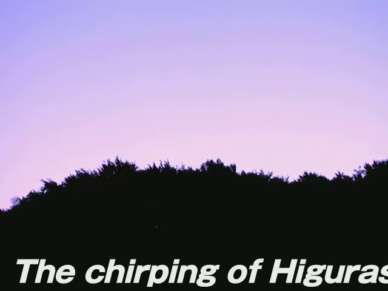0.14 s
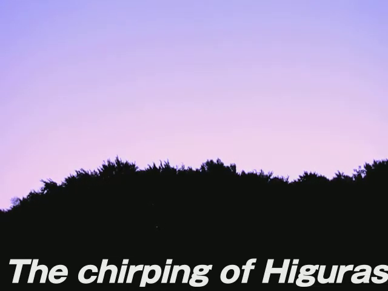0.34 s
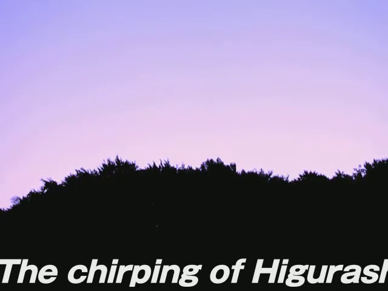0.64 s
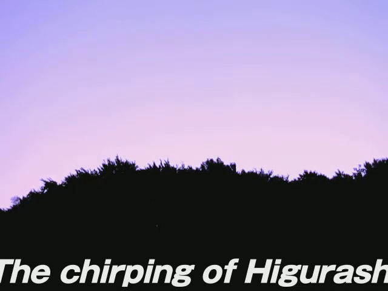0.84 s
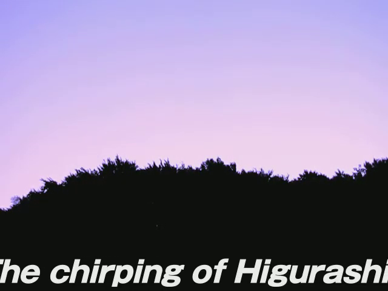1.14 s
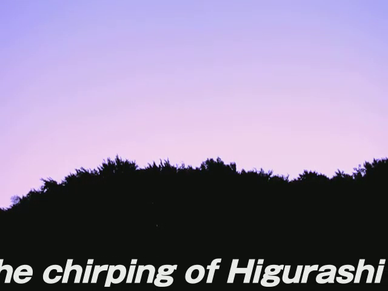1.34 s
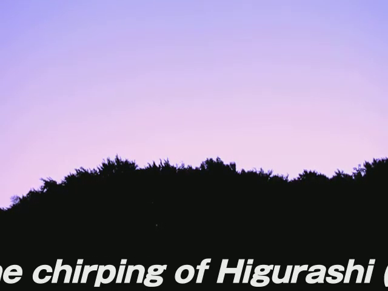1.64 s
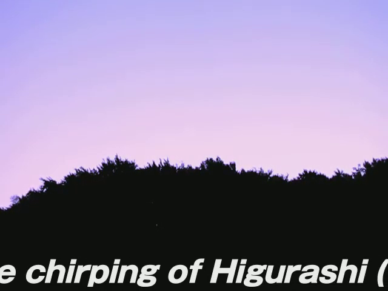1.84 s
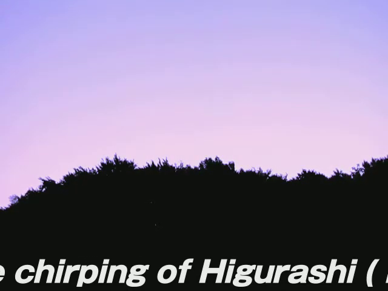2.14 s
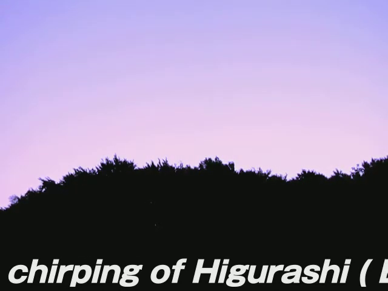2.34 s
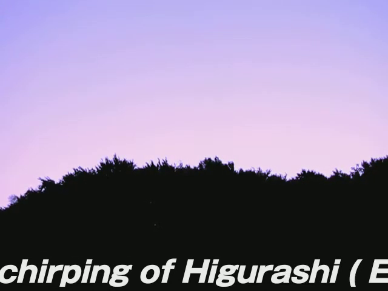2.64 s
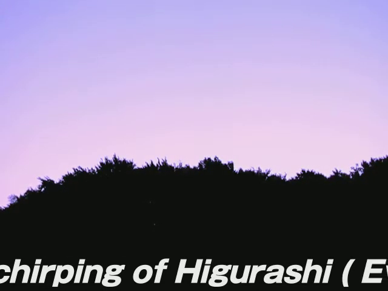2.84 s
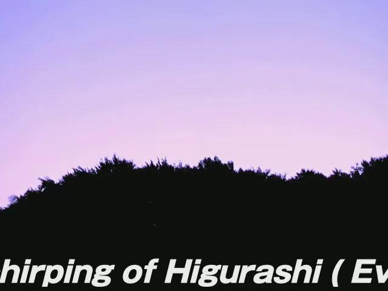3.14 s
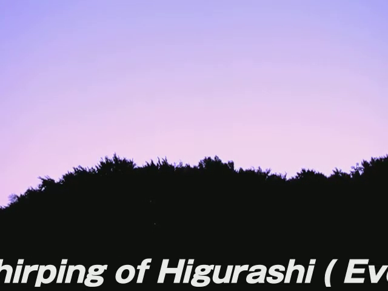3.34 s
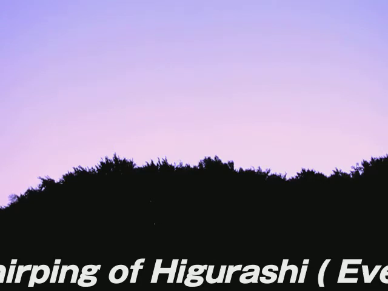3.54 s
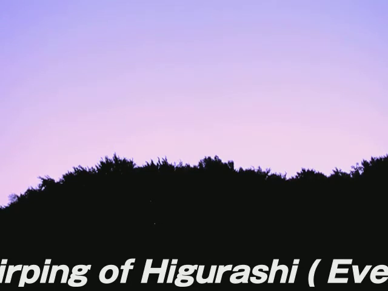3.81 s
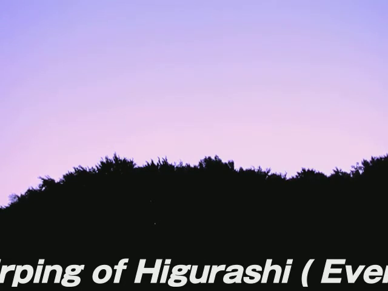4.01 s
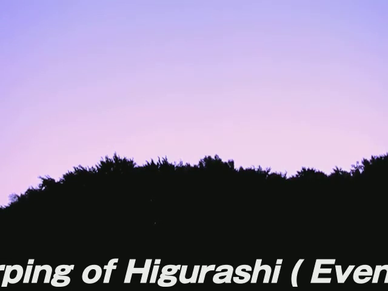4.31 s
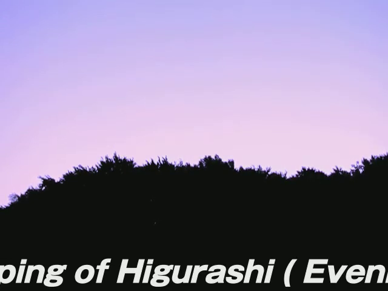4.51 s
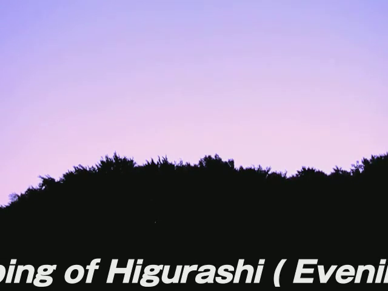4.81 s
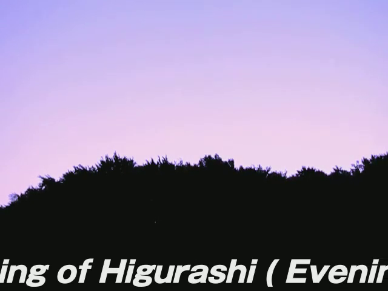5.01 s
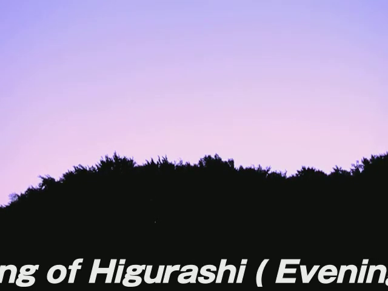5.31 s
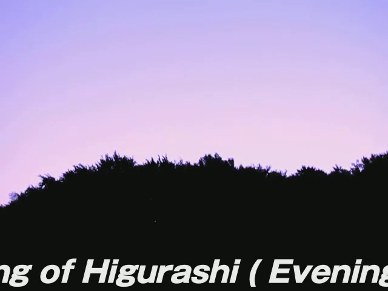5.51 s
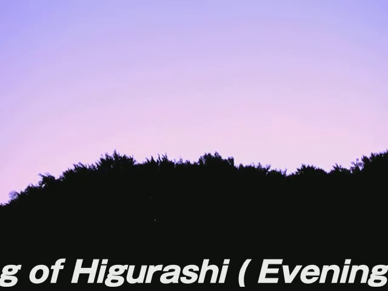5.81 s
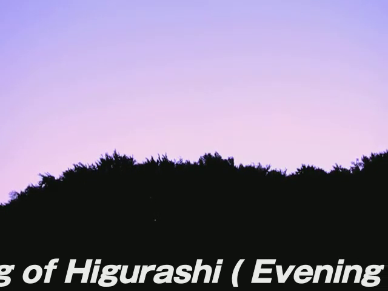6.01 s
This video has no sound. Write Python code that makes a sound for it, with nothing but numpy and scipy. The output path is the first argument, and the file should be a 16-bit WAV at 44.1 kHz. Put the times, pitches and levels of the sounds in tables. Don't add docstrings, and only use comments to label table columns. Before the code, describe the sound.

A stereo dusk ambience on a wooded hillside, about six seconds long. From the start a bird on the left gives quick rising whistles, warbled near the top and plunging at the end, about every 0.37 seconds until 1.5. A second bird on the right interleaves steep chirps, arching whistles at 1.2 and 1.5, a high loop at 1.8, and more calls until 3.2. Left whistles answer at 2.4, 3.3 and, loudest, 3.7. Stronger warbled rises come at 4.0 and 4.4, then softer short whistles from 5.1 to the end. Throughout, evening cicadas overlap pulsing trains of hoarse ringing notes, roughly nine per second, over a blurred far chorus. A steady high buzz weakens and quickens after 5. A thin hiss fades by 2; a dry twig ticks at 5.1. Faint hum, leaves and low town rumble remain behind, with short echoes among trunks.

```python
import sys
import numpy as np
from scipy import signal
from scipy.fft import rfft, irfft, next_fast_len
from scipy.io import wavfile
from scipy.ndimage import uniform_filter1d, map_coordinates

SR = 44100
rng = np.random.default_rng(int(sys.argv[2]) if len(sys.argv) > 2 else 0)


def master(y):
    cut = np.clip(np.atleast_2d(y).T, -1, 1)
    pcm = np.round(cut * 32767)
    wavfile.write(sys.argv[1], SR, pcm.astype(np.int16))


def gain_from_db(level_db):
    decades = np.asarray(level_db, float) / 20
    return 10 ** decades


N = 271656
T = np.arange(N) / SR
LEFT_BIRD = dict(pan_db=5, lead=4)
RIGHT_BIRD = dict(pan_db=-6, lead=-4)


def birds():
    out = np.zeros((2, N + 2 * SR))
    whistled_calls(out)
    steep_calls(out)
    hooked_endings(out)
    rising_calls(out)
    return out[:, SR:SR + N]


FLAT_ARCH = [(0, .6), (.1, .76), (.28, .92), (.55, 1), (.8, .9), (.87, .6), (.94, 0)]
FLAT_SWELL = [-20, -7, -2.5, 0, -3, -21, -25]
TALL_ARCH = [(0, .05), (.09, .6), (.3, .84), (.5, .97), (.68, 1), (.86, .74), (1, 0)]
TALL_SWELL = [-28, -9.5, -3.5, 1.8, -10, -8.5, -29]
# (start [s], length [s], top pitch [Hz], peak level [dB])
LEFT_FLAT_CALLS = [
    (2.426, 0.15, 3380, -27),
    (3.308, 0.13, 3358, -25.5),
    (3.686, 0.14, 3600, -21.5),
    (5.722, 0.095, 3230, -37),
    (6.013, .105, 3550, -29.5),
]
# (start [s], length [s], top pitch [Hz], peak level [dB])
RIGHT_FLAT_CALLS = [
    (1.198, 0.11, 3437, -23),
    (1.463, 0.11, 3600, -22.5),
    (5.143, .106, 3336, -32),
    (5.784, .09, 3260, -28.5),
]
# (start [s], length [s], top pitch [Hz], peak level [dB])
RIGHT_TALL_CALLS = [
    (2.721, 0.11, 3885, -23),
    (3.132, .08, 4080, -28.5),
]
# (time [s], pitch [Hz], level [dB])
DOWNWARD_SLUR = [
    (6.07, 5560, -36),
    (6.1, 4500, -32),
    (6.125, 3630, -35),
    (6.15, 2940, -53),
]
# (time [s], pitch [Hz], level [dB])
LOOPING_CALL = [
    (1.742, 2390, -60),
    (1.755, 3170, -29.5),
    (1.768, 3650, -27),
    (1.785, 4460, -33),
    (1.822, 4980, -26.5),
    (1.838, 4430, -31),
    (1.852, 2600, -38),
]
# (time [s], pitch [Hz], level [dB])
SWEEPING_CALL = [
    (2.398, 2340, -46),
    (2.405, 3600, -34),
    (2.435, 3970, -35),
    (2.46, 4770, -33),
    (2.49, 5700, -46),
    (2.53, 6220, -52),
    (2.545, 4120, -46),
    (2.56, 2190, -38),
]


def whistled_calls(out):
    left = arches(FLAT_ARCH, FLAT_SWELL, LEFT_FLAT_CALLS) + [DOWNWARD_SLUR]
    right = arches(FLAT_ARCH, FLAT_SWELL, RIGHT_FLAT_CALLS)
    strained = arches(TALL_ARCH, TALL_SWELL, RIGHT_TALL_CALLS) + [LOOPING_CALL, SWEEPING_CALL]
    voices = [
        (left, LEFT_BIRD, 3, 1.2, -12),
        (right, RIGHT_BIRD, -2, 2, -10.5),
        (strained, RIGHT_BIRD, -2, 2.4, -6),
    ]
    for calls, perch, bright_db, hoarse_db, wet_db in voices:
        for rows in calls:
            start_s, (hz, db) = smooth(rows, ease_s=0.008)
            call = whistle(hz, db, bright_db, hoarse_db)
            add(out, call, start_s, **perch, wet_db=wet_db, gap_s=.025)


def arches(shape, swell_db, calls):
    bottom_hz = 2250
    share, climb = np.transpose(shape)
    rows = []
    for start_s, length_s, top_hz, peak_db in calls:
        hz = bottom_hz + (top_hz - bottom_hz) * climb
        rows.append(np.transpose([start_s + length_s * share, hz, peak_db + np.array(swell_db)]))
    return rows


# (time after start [s], pitch [Hz], level [dB])
STEEP_SHAPE = [
    (0, 2910, -24),
    (.008, 3215, 0.5),
    (0.019, 4630, 3),
    (0.039, 5970, -5),
    (.07, 7700, -26),
    (.085, 6920, -7),
    (0.099, 4180, -14),
    (0.107, 3510, -0.5),
    (.114, 2800, -16),
]
# (start [s], time stretch [1], peak level [dB])
STEEP_CALLS = [
    (0.017, 1.02, -33.5),
    (0.355, 1.07, -31.5),
    (2.068, 1, -33),
    (2.995, 1.1, -32.5),
]


def steep_calls(out):
    for start_s, stretch, peak_db in STEEP_CALLS:
        _, (hz, db) = smooth(np.array(STEEP_SHAPE) * [stretch, 1, 1], ease_s=0.0028)
        call = whistle(hz, db + peak_db, bright_db=-1, hoarse_db=3)
        add(out, call, start_s, **RIGHT_BIRD, wet_db=-5, gap_s=.02)


# (time after start [s], pitch [Hz], level [dB])
HOOK_SHAPE = [
    (0, 2700, -19),
    (.008, 2640, 2.5),
    (.022, 2404, 4),
    (.03, 2700, -3),
]
# (start [s], peak level [dB])
HOOK_CALLS = [
    (.133, -42.5),
    (.474, -41.5),
    (1.85, -38),
    (2.185, -43),
    (3.105, -47),
]


def hooked_endings(out):
    for start_s, peak_db in HOOK_CALLS:
        _, (hz, db) = smooth(HOOK_SHAPE, ease_s=0.0035)
        call = whistle(hz, db + peak_db, bright_db=8, hoarse_db=1.5)
        add(out, call, start_s, **RIGHT_BIRD, wet_db=-10, gap_s=.02)


# (time after start [s], pitch [Hz], level [dB], warble depth [Hz])
RISING_SHAPE = [
    (0, 2530, -24, 7),
    (.008, 3600, -4, 0),
    (.046, 4198, 3, 64),
    (.085, 5365, 3.5, 300),
    (.11, 5803, 6.5, 390),
    (.138, 6200, 1, 330),
    (0.151, 6266, 7, 0),
    (0.166, 6120, -1.5, 0),
    (.175, 5342, 1.5, 0),
                (.178, 4440, -19, 0),
    (0.18, 3537, 9.5, 0),
    (.185, 2464, -12, 0),
    (.194, 1600, -3, 0),
]
# (start [s], time stretch [1], pitch factor [1], peak level [dB], left over right [dB])
RISING_CALLS = [
    (-.148, 0.96, 1.02, -33.5, 5.5),
    (.208, 1, 1, -35, 6.5),
    (.57, 1, 1.01, -34, 5.5),
    (.94, 1, 1, -35, 6.5),
    (1.31, 0.92, 0.99, -35.5, 7.5),
    (4.026, 0.98, 1.008, -32.5, 7),
    (4.439, .97, 0.99, -35, 7),
]


def rising_calls(out):
    for start_s, stretch, factor, peak_db, pan_db in RISING_CALLS:
        _, (hz, db, depth_hz) = smooth(np.array(RISING_SHAPE) * [stretch, factor, 1, 1], ease_s=.004)
        warble_rate = 275 + 45 * wobble(88.4, size=len(hz))
        warble = depth_hz * np.sin(2 * np.pi * np.cumsum(warble_rate) / SR)
        level_db = db + peak_db - 0.0023 * warble
        call = whistle(hz + warble, level_db, bright_db=2.5, hoarse_db=-0.5)
        add(out, call, start_s, pan_db, lead=round(pan_db / 3), wet_db=-5.5, gap_s=.014)


# (harmonic [1], level against the second harmonic [dB])
SYRINX = [(1, -34), (3, -22), (4, -24), (6, -31), (8, -39)]


def whistle(hz, db, bright_db, hoarse_db):
    phase = np.pi * np.cumsum(hz) / SR
    tone = np.sin(2 * phase)
    for k, level_db in SYRINX:
        overtone_hz = k * hz / 2
        throat_db = 19 * np.exp(-((overtone_hz - 3500) / 500) ** 2)
        air_db = -.0025 * np.maximum(overtone_hz - 10500, 0)
        tone += gain_from_db(level_db + bright_db + throat_db + air_db) * np.sin(k * phase)
    grain = gain_from_db(hoarse_db * wobble(365.3, size=len(hz)))
    edges = signal.windows.tukey(len(hz), min(1, 0.004 * SR / len(hz)))
    return gain_from_db(db) * grain * tone * edges


# (last note [s], notes [count], gap [s], extra gap before the last note [s])
BEATS = [(2.3, 19, .114, .176), (2.04, 22, .109, 0), (4.296, 20, .108, 0), (4.62, 18, .1085, 0),
         (6.12, 21, .1078, 0), (5.357, 12, .111, 0), (6.11, 13, .112, 0), (6.12, 4, .11, 0),
         (5.13, 8, .111, 0), (1.59, 8, .109, 0), (6.22, 2, .1, 0)]
# (pitch [Hz], sag [Hz/s], fundamental level [dB], octave level [dB], fade [dB/s])
SINGER_VOICES = [(2121, 28, -42, -35, -0.6), (2200, 19.1, -47.5, -35.5, 0.5), (2160, 24, -43, -30, 5.5),
                 (2249, 23.3, -42, -40, 1.5), (2117, 1.6, -50, -42, 0.5), (2270, 13.1, -52.5, -53, -1.5),
                 (2183, 13.1, -46, -47, -1), (2276, 1.7, -47, -37.5, -6), (2065, 9.3, -49, -59, -5),
                 (2130, 8.5, -47, -36, 3), (2200, 1.5, -43, -27.5, .1)]
# (fundamental left over right [dB], octave left over right [dB])
SINGER_PLACES = [(-5, 1.5), (-1, 3.5), (-7, 2), (-3, 1), (-1.5, 2.4), (-1, -1), (-3.5, 2), (0, 1.9),
                 (-2.1, -9), (-7, 8.5), (-5, -2.5)]
WARM_UP_FLATNESS = [12, 0, 51, 110, 10, 11, 5.5, 41, 2, 6, 16]


def evening_cicadas():
    out = np.zeros((2, N + 2 * SR))
    t = np.arange(-SR // 10, SR // 10) / SR
    swell = np.exp(-.5 * (t / np.where(t < 0, .017, .024)) ** 2)
    singers = zip(BEATS, SINGER_VOICES, SINGER_PLACES, WARM_UP_FLATNESS)
    for beat, voice, place, warm_up_hz in singers:
        notes = phrase(beat, voice, warm_up_hz)
        first_s = notes[0, 0]
        song = np.zeros((2, round((notes[-1, 0] - first_s) * SR) + len(t)))
        for s, hz, low_db, octave_db in notes:
            phase = 2 * np.pi * np.cumsum(hz - 120 * t + 4 * wobble(37.6, size=len(t))) / SR
            low = gain_from_db(low_db) * np.sin(phase)
            high = gain_from_db(octave_db) * (np.sin(2 * phase) + gain_from_db(-11) * np.sin(3 * phase))
            hoarseness = gain_from_db(1.9 * wobble(127, size=len(t)))
            at = round((s - first_s) * SR)
            song[:, at:at + len(t)] += swell * np.array([low, high]) * hoarseness
        for part, pan_db in zip(song, place):
            add(out, part, first_s + t[0], pan_db, lead=round(pan_db), wet_db=-5.5, gap_s=.015)
    return out[:, SR:SR + N]


def phrase(beat, voice, warm_up_hz):
    last_s, notes, gap_s, tiring_s = beat
    hz, sag, low_db, octave_db, fade = voice
    k = np.arange(notes)
    chance = rng.standard_normal((notes, 4))
    tiring_notes, warm_up_notes = 3, 1.2
    gaps = gap_s + tiring_s * np.exp(-k[:-1] / tiring_notes)
    s = last_s - np.cumsum(np.r_[0, gaps])[::-1]
    cold = np.exp(-k / warm_up_notes)
    tired_db = 32 * tiring_s * np.exp(-k[::-1] / tiring_notes)
    trend_db = -fade * (s - s[0]) - 4.5 * cold - tired_db
    pitch = hz - sag * (s - s[0]) - warm_up_hz * cold + 2.5 * chance[:, 1]
    low = low_db + trend_db + 1.5 * chance[:, 2]
    octave = octave_db + trend_db + 1.5 * chance[:, 3]
    return np.transpose([s + .004 * chance[:, 0], pitch, low, octave])


# (time [s], click rate [1/s], flutter [Hz], drum centre [Hz], level [dB])
BUZZ_COURSE = [
    (0, 453.5, 127.6, 8130, -40.5),
    (.6, 454.2, 128.7, 8130, -38.5),
    (2, 455.9, 125.5, 8140, -41),
    (3.3, 458, 113.5, 8060, -40.5),
    (4.3, 460.4, 110.2, 7920, -40.5),
    (5, 466, 111.1, 7630, -41),
    (5.6, 479, 110, 7700, -46),
    (6.16, 505, 110.6, 7880, -48.5),
]


def buzzing_cicada():
    times, *columns = np.transpose(BUZZ_COURSE)
    rate, flutter_hz, centre_hz, db = [np.interp(T, times, c) for c in columns]
    turn = 2 * np.pi * np.cumsum(rate + 0.61 * wobble(25)) / SR
    flutter = 2 * np.pi * np.cumsum(flutter_hz + 3 * wobble(15)) / SR
    voice = 0
    for k in range(13, 23):
        a, b, c, d = np.exp(3j * rng.random(4))
        beat = a + 0.62 * b * np.exp(-1j * flutter) + .5 * c * np.exp(1j * flutter)
        beat = beat + 0.28 * d * np.exp(.23j * flutter)
        rasp = (0.35 + 0.012 * (rate - 454)) * (wobble(260) + 1j * wobble(260))
        drum = 1 / (1 + ((k * rate - centre_hz) / 900) ** 2) ** 2
        line = np.real((beat + rasp) * np.exp(1j * k * turn))
        voice = voice + drum * gain_from_db(0.42 * wobble(2.56)) * line
    voice = unit(voice) * gain_from_db(db)
    return voice * gain_from_db([[-1.5], [-1.8]]) + gain_from_db(-6.0) * woods(voice, .02)[:, :N]


# (time [s], level [dB])
TWIG_TICKS = [
    (5.123, -31),
]


def twig():
    blows = np.zeros(N)
    for s, db in TWIG_TICKS:
        blows[round(s * SR)] = gain_from_db(db + 17)
    return filtered(blows, modes([(1600, 1700, 0.0044)]))


# (frequency [Hz], density [dB/Hz])
SIZZLE_BAND = [(9000, -30), (9700, -3), (10800, 0.1), (11000, -30)]


def sizzle():
    fade = 1 / (1 + np.exp((T - 2) / 0.37))
    band = [(8000, -120)] + SIZZLE_BAND + [(11400, -120)]
    hiss = unit(rush(lambda hz: gain_from_db(along(band, hz)), [(10000, 0.27)]))
    return gain_from_db(-58 + 3.5 * wobble(120)) * fade * hiss


# (centre [Hz], width [Hz], level [dB])
CHORUS_BANDS = [(2131, 126, -1), (4255, 390, -0.5), (6337, 360, -6)]
# (time [s], level [dB])
CHORUS_LEVEL = [
    (0.0, -41),
    (5.78, -46),
    (6.16, -41.5),
]


def far_chorus():
    bands = modes(CHORUS_BANDS)
    chorus = unit(rush(lambda hz: bands(hz) ** 2, [(2000, 1.0), (8000, 0.1)]))
    return chorus * gain_from_db(np.interp(T, *np.transpose(CHORUS_LEVEL)) + 1.0 + 1.0 * wobble(9.7))


# (frequency [Hz], density [dB/Hz])
HAZE_BAND = [(1800, -10), (2600, -10), (3600, 10), (5500, 3.5), (7000, 4), (9000, -25)]
# (time [s], level [dB])
HAZE_COURSE = [
    (0, -41.5),
    (1.5, -45),
    (3, -48),
    (3.8, -56),
    (4.6, -48),
    (5, -55),
    (5.6, -53),
    (6.16, -42),
]
# (time [s], spread [s], centre [Hz], width [Hz], level [dB])
FAR_SWELL = (5.5, .2, 2560, 260, -52)


def far_birds():
    haze = unit(rush(lambda hz: gain_from_db(along(HAZE_BAND, hz)), [(3000, 0.026)]))
    haze = haze * gain_from_db(np.interp(T, *np.transpose(HAZE_COURSE)))
    s, spread_s, centre_hz, width_hz, db = FAR_SWELL
    call = unit(rush(lambda f: modes([(centre_hz, width_hz, 0)])(f) ** 2, [(centre_hz, .3)]))
    return haze + gain_from_db(db) * np.exp(-((T - s) / spread_s) ** 2) * call


# (pitch [Hz], width [Hz], level [dB])
MACHINES = [(292, 37, -60), (349, 11.5, -54), (391, 13.3, -51), (743, 7.2, -64.5)]


def hum():
    out = 0
    for hz, width_hz, db in MACHINES:
        phase = 2 * np.pi * np.cumsum(hz + 1.523 * wobble(4)) / SR
        tone = gain_from_db(db + 2.0 + 0.37 * wobble(2.93)) * np.sin(phase)
        blur = unit(rush(lambda f: modes([(hz, width_hz, 0)])(f) ** 2, [(300, 0.39)]))
        out = out + tone + gain_from_db(db - 13.5) * blur
    return out


# (frequency [Hz], density [dB/Hz])
AIR_SPECTRUM = [(20, -32), (60, -15), (130, -7), (300, -2.5), (500, -6.5), (900, -12.5), (1500, -13.5),
                (2700, -16),
                (5300, -36), (8000, -6), (10800, -27), (11050, -36), (13000, -36.5), (15200, -40.5)]
# (frequency [Hz], left-right correlation [1])
LIKENESS = [(40, 0.95), (180, 0.96), (350, 0.99), (650, 0.78), (1400, 0.23), (5000, 0.96), (10000, 0.024),
            (12000, 0.098)]


def town_and_leaves():
    air = unit(rush(lambda hz: gain_from_db(along(AIR_SPECTRUM, hz)), LIKENESS))
    return gain_from_db(-43) * air * gain_from_db([[-.7], [.7]])


# (frequency [Hz], decay time t60 [s])
WOODS_DECAY = [(1500, 1), (4000, 0.68), (9000, 0.097)]


def woods(x, gap_s):
    hz, t, z = signal.stft(rng.standard_normal((2, SR // 2)), SR, nperseg=256)
    decay = gain_from_db(-60 * t / along(WOODS_DECAY, hz)[:, None])
    tail = signal.istft(z * decay, SR, nperseg=256)[1]
    late = np.pad(x, (round(gap_s * SR), 0))
    return signal.fftconvolve(late[None], tail / np.linalg.norm(tail[0]), axes=1)


def add(out, sound, start_s, pan_db, lead, wet_db, gap_s):
    echo = woods(sound, gap_s)
    echo = echo * gain_from_db(wet_db + 1.8 * wobble(90, size=echo.shape[1]))
    parts = list(zip(out, echo, (0, 0)))
    parts += [(out[0], sound * gain_from_db(pan_db / 2), 0), (out[1], sound * gain_from_db(-pan_db / 2), lead)]
    for track, part, shift in parts:
        at = round(start_s * SR) + SR + shift
        track[at:at + len(part)] += part[:len(track) - at]


def rush(response, alike):
    def turn(hz):
        return np.arccos(np.clip(along(alike, hz), -1, 1)) / 2

    noise = rng.standard_normal((2, N))
    mid, side = filtered(noise, lambda hz: response(hz) * [np.cos(turn(hz)), np.sin(turn(hz))])
    return np.array([mid + side, mid - side])


def modes(table):
    def response(f):
        total = 0
        for k, (c, w, db) in enumerate(table):
            total = total + (-1) ** k * gain_from_db(db) * 1j * f * w / (c * c - f * f + 1j * f * w)
        return total

    return response


def filtered(x, response):
    m = next_fast_len(N + SR // 4)
    return irfft(rfft(x, m) * response(np.fft.rfftfreq(m, 1 / SR)), m)[..., :N]


def smooth(rows, ease_s):
    s, *columns = np.transpose(rows)
    t = np.arange(s[0], s[-1], 1 / SR)
    size = max(1, round(ease_s * SR))
    return s[0], [uniform_filter1d(np.interp(t, s, c), size, mode="nearest") for c in columns]


def wobble(rate, size=N):
    knots = rng.standard_normal(int(size * rate / SR) + 4)
    return map_coordinates(knots, [np.arange(size) * rate / SR])


def along(points, hz):
    f, v = np.transpose(points)
    return np.interp(np.log(hz + 1), np.log(f + 1), v)


def unit(x):
    return x / np.sqrt(np.mean(x ** 2) + 1e-20)


def scene():
    near = birds() + evening_cicadas() + buzzing_cicada() + twig() + sizzle()
    return near + far_chorus() + far_birds() + hum() + town_and_leaves()


def roll_off(x):
    return signal.sosfilt(signal.butter(12, 15630, fs=SR, output="sos"), x)


def record(dry):
    mix = filtered(dry, lambda hz: hz < 15640)
    return roll_off(mix)


dry = scene()
out = record(dry)
master(out)
```